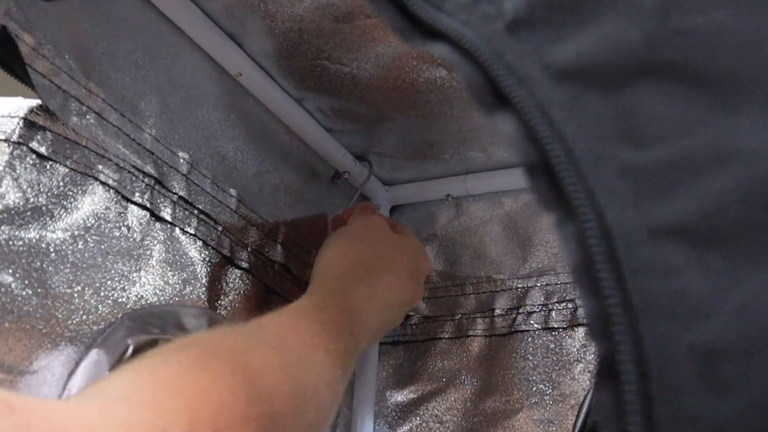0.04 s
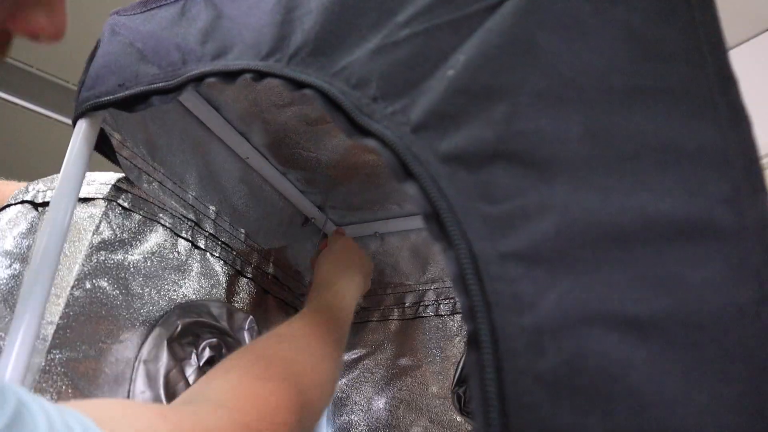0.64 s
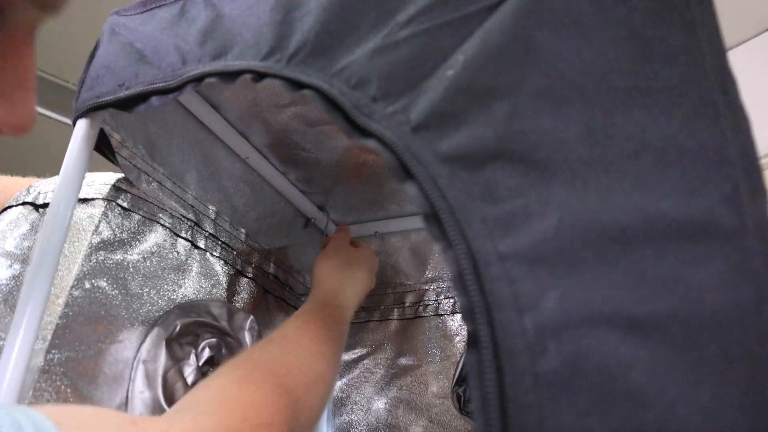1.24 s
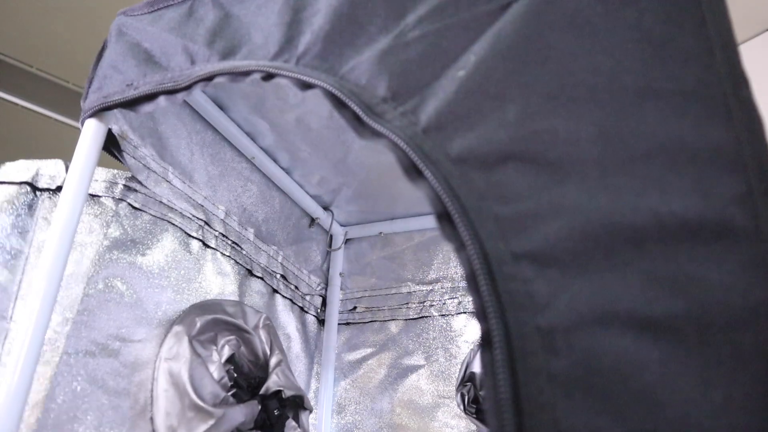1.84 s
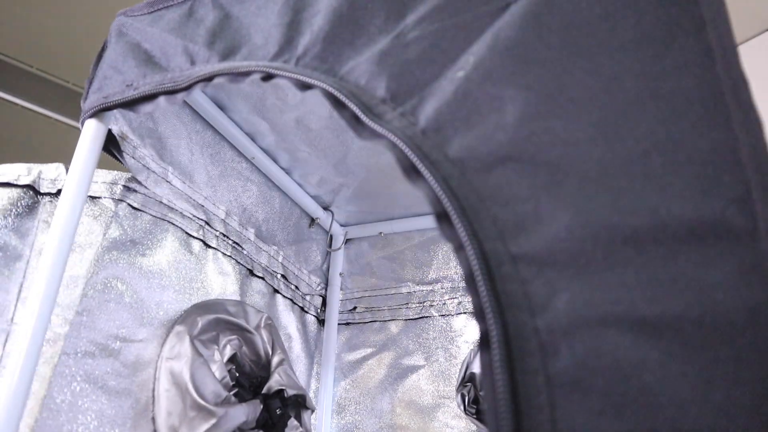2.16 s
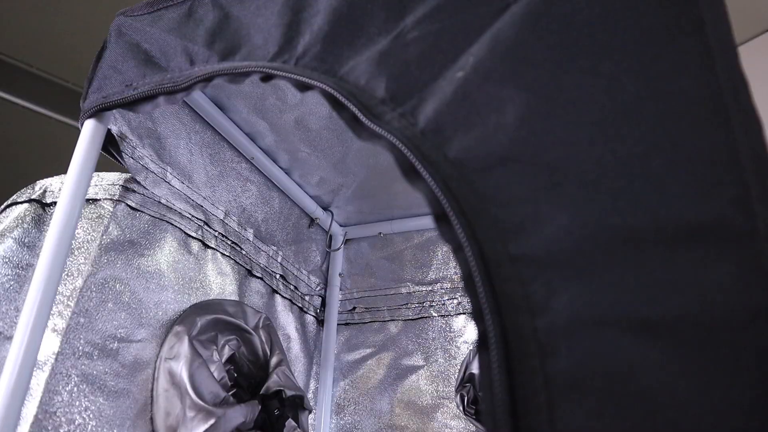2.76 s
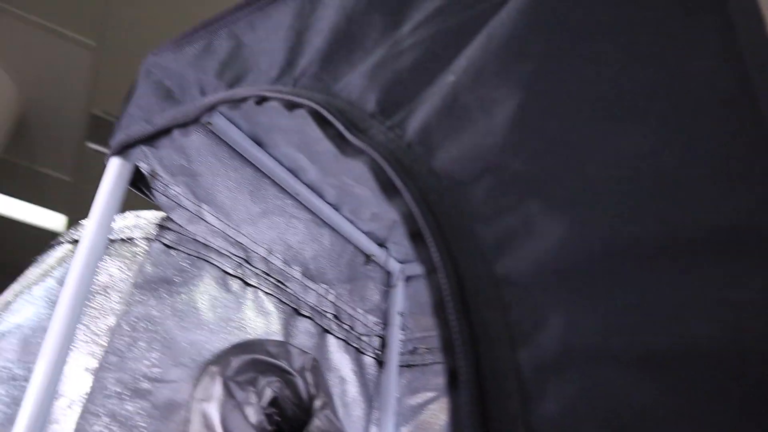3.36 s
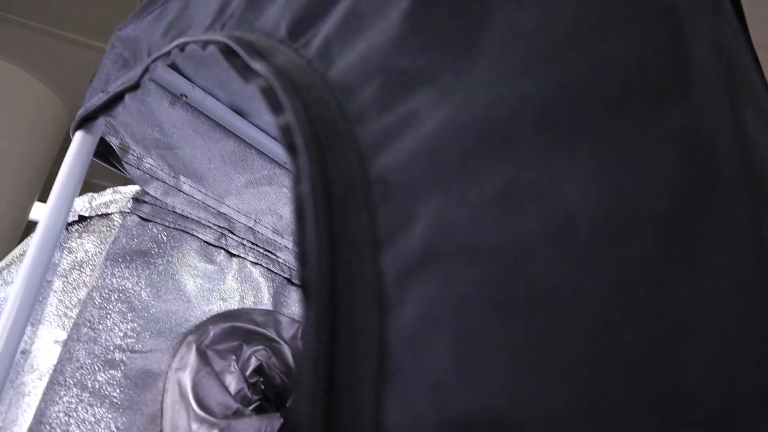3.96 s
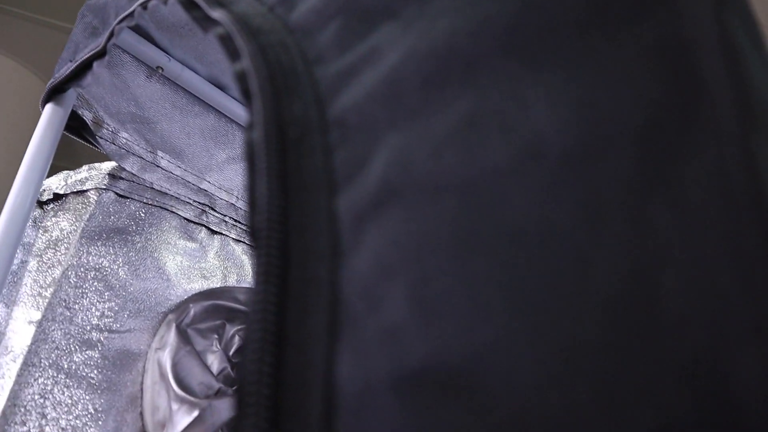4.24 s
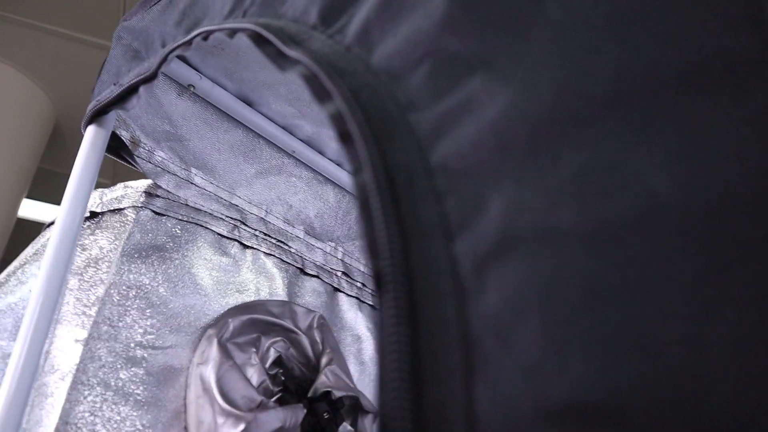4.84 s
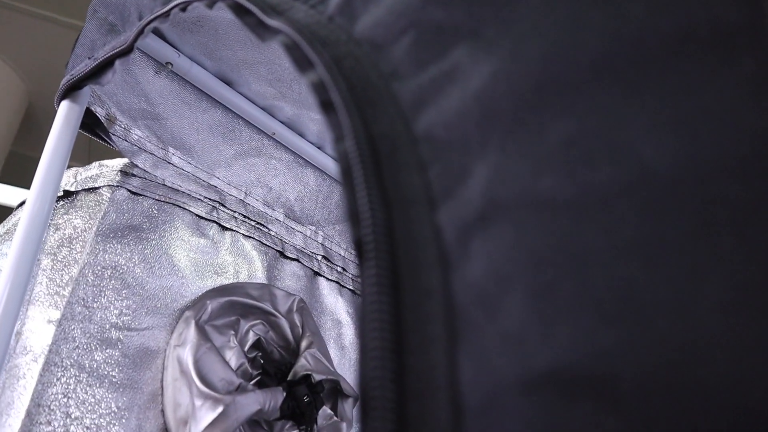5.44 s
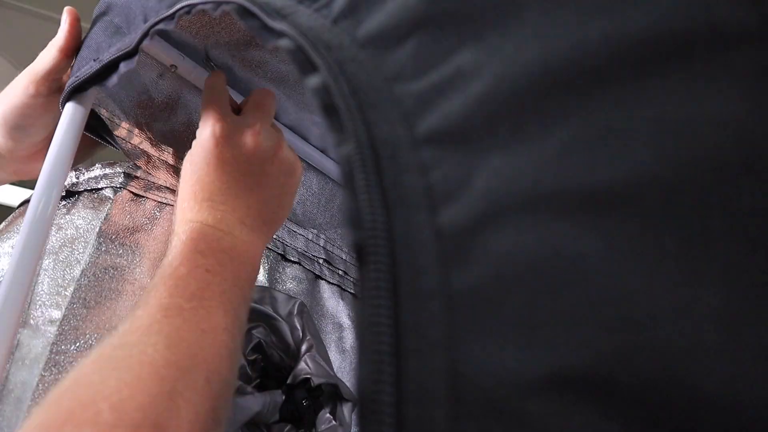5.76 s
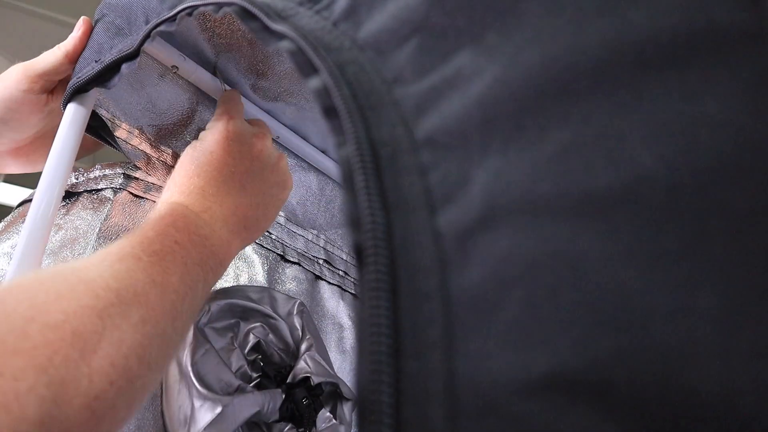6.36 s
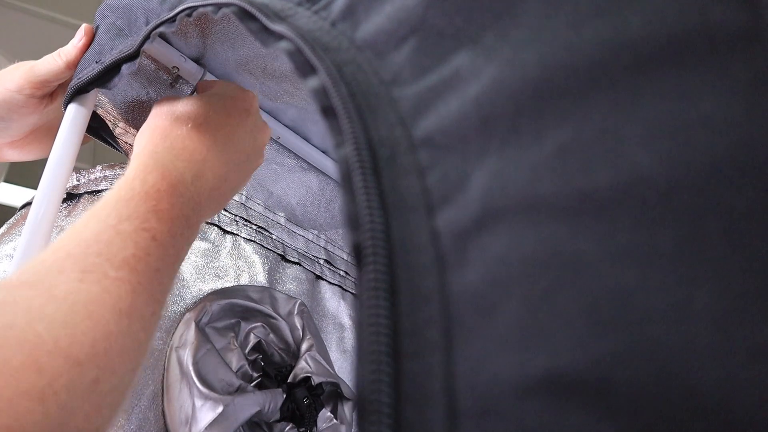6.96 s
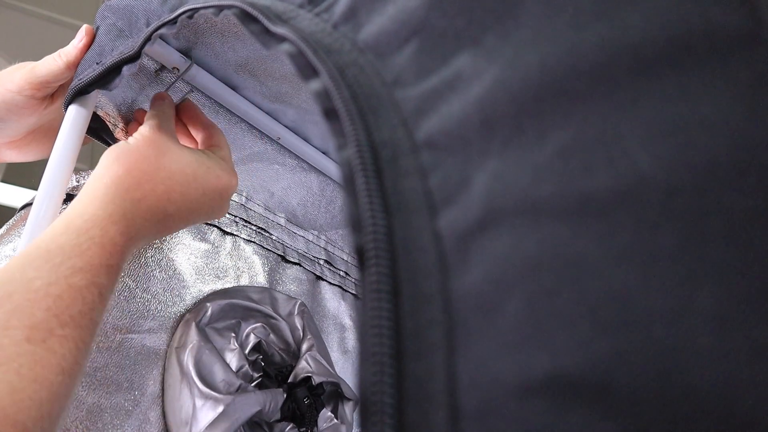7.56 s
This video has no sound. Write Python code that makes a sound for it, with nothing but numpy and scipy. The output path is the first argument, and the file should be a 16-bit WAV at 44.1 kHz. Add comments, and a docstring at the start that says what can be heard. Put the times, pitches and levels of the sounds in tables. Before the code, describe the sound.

Close to the microphone, tent cloth sways and rustles, its foil lining hissing lightly while the padded-sounding frame knocks. The fabric slaps tight, then a wire hook strikes a pole with a short ringing clatter. After a quieter stretch of scattered rubbing, more knocks come with a few sharp metallic clicks as a hook is hung. Faint ventilation rumbles through the small indoor scene.

```python
"""The fabric of a foil-lined tent billows, rubs and crinkles under an arm, close up in a quiet room.
The cloth slaps taut, the damped frame knocks, and quick strokes over the foil hiss. Wire hooks are
hung on the metal poles: each clicks, rings and sets the pole clattering. Now and then a crease in
the foil snaps over. Ventilation rushes low underneath, and both channels carry the same sound."""
import sys
import numpy as np
from scipy import signal
from scipy.io import wavfile
from scipy.ndimage import uniform_filter1d

SR = 44100
rng = np.random.default_rng(int(sys.argv[2]) if len(sys.argv) > 2 else 0)


def to_wav(s):
    """Save 16-bit WAV."""
    ch = np.atleast_2d(s).T  # columns
    pcm = np.round(np.clip(ch, -1, 1) * 32767)  # PCM
    wavfile.write(sys.argv[1], SR, pcm.astype(np.int16))


N = 339570
TIME = np.arange(N) / SR
AGE = np.arange(SR // 2) / SR  # seconds since a hit

# held fabric creeping faintly between strokes: t/s, rub level/dB
CREEP_LEVELS = [(0, -62), (1.1, -60.5), (1.6, -57.5), (2.08, -57.5), (2.5, -70.5), (4.25, -71),
                (4.55, -61.5), (5.3, -75), (5.65, -64), (6.15, -58.5), (6.7, -59), (7.03, -68.5),
                (7.2, -62), (7.7, -67)]
# arm and hands sliding over the fabric: t/s, length/s, rub level/dB, swell/dB, foil over rub/dB
ARM_STROKES = [(0, 0.35, -47.5, -3.5, -10.5), (0.381, 0.072, -47.5, 2, -11),
               (.487, 0.38, -46.5, -2.5, -7.5), (0.902, 0.14, -50.5, 5.5, -5.5),
               (1.12, 0.4, -49.5, -0.5, -9.5), (1.792, 0.12, -52.5, 14, -9), (2.155, 0.057, -50, -4, -11),
               (2.677, 1, -56, -8, 0), (3.53, 0.072, -41.5, -1, -3), (3.594, 0.08, -53.5, 5.5, -2),
               (3.682, 0.46, -56.5, -8.5, -5), (4.553, 0.13, -53.5, 3, -4.5),
               (4.689, 0.24, -49.5, -6, -0.5), (4.924, 0.11, -52.5, -1.3, .5), (5.039, 0.15, -65, 2.7, -5),
               (5.671, 0.21, -52.5, -4.5, -7), (6.282, 0.2, -53, -7, -23), (6.75, 0.1, -58, 8, -16)]
# the whole wall heaving when pushed: peak t/s, width/s, level/dB
WALL_HEAVES = [(.395, 0.061, -38.5), (0.518, .12, -38.5), (1.019, 0.064, -37), (1.87, .16, -38),
               (1.935, 0.042, -34.5), (2.08, 0.092, -43), (2.185, 0.068, -40), (4.63, 0.07, -53),
               (6.43, 0.28, -45), (6.82, 0.063, -41.5)]
# boom of swaying cloth: f/Hz, level/dB
BILLOW_EQ = [(40, -34.5), (80, 5.5), (130, 1), (200, 0.5), (350, -2), (500, -7.5), (800, -19.5),
             (1500, -44)]
# midrange rasp of the weave: f/Hz, level/dB
RUB_EQ = [(250, -26), (500, 2.5), (900, -2.5), (1500, -5), (2500, -8.5), (3500, -16.5), (5000, -30),
          (8000, -38)]
# sparkle of the foil lining: f/Hz, level/dB
FOIL_EQ = [(1800, -2.5), (3500, 4), (5000, 2), (7500, -2.5), (10000, -7), (16000, -19.5)]
# fabric going taut: t/s, level/dB, corner f/Hz, t60/s
FLAP_HITS = [(0.006, -24, 196, 0.22), (0.095, -25, 328, 0.034), (0.189, -21.5, 312, 0.064),
             (0.503, -27.5, 189, 0.15), (1.5248, -11.5, 420, 0.21), (1.564, -28, 477, 0.11),
             (1.611, -28.5, 805, 0.036), (1.791, -26.5, 700, 0.07), (2.012, -31.5, 135, 0.048),
             (3.546, -24, 350, 0.11), (4.003, -37, 180, 0.037), (5.6766, -33.5, 415, 0.11),
             (5.926, -24.5, 195, 0.06), (6.05, -27.5, 99, 0.078), (6.137, -31, 606, .05),
             (7.106, -32.5, 393, 0.099), (7.146, -27, 169, 0.16)]
# dull body of taut fabric: f/Hz, level/dB
TAUT_EQ = [(30, -21), (70, -6.5), (150, 0.5), (1000, 1), (2500, -9.5), (16000, -36)]
# blows on the frame: t/s, level/dB, resonance f/Hz, t60/s, tick level/dB
KNOCK_HITS = [(0.164, -21, 910, 0.011, -42.5), (0.2235, -30.5, 1140, 0.055, -46.5),
              (0.407, -24.5, 1330, 0.025, -57), (0.4668, -31.5, 1090, 0.011, -45),
              (1.807, -24, 490, 0.049, -48), (1.861, -19.5, 626, 0.065, -42),
              (1.9251, -15.5, 790, 0.043, -44), (2.053, -29, 640, 0.065, -49),
              (2.2089, -34, 460, 0.073, -52), (2.3077, -27, 580, 0.023, -59),
              (2.5635, -41, 800, 0.041, -68), (3.569, -25.5, 900, 0.069, -48), (3.815, -43, 900, .04, -62),
              (4.177, -42, 890, 0.011, -55.5), (4.649, -37, 700, 0.14, -66), (4.971, -28.5, 485, 0.23, -66),
              (5.9147, -28.5, 710, 0.023, -45), (6.1544, -26.5, 520, 0.062, -50),
              (6.2509, -13.5, 900, 0.025, -49), (6.3893, -32.5, 530, 0.084, -57),
              (6.431, -22.5, 720, 0.088, -41), (6.539, -19, 626, 0.032, -30),
              (6.8651, -17, 1060, 0.063, -49), (7.1366, -24.5, 776, .09, -35.5),
              (7.283, -38.5, 1180, 0.024, -43), (7.3825, -25, 1470, 0.046, -27.5)]
# body of the cloth-damped frame: f/Hz, level/dB
FRAME_EQ = [(30, -20.5), (140, -2), (400, -4), (1000, -0.5), (1600, 2), (2300, 3), (3000, 3), (3700, 2),
            (6000, -24), (16000, -35.5)]
# the arm brushing quickly past the foil: t/s, length/s, level/dB, swell/dB
SWISH_STROKES = [(.495, 0.344, -62.5, 0), (1.27, 0.22, -67, 10), (1.823, .11, -64, 3)]
# airy top of brushed foil: f/Hz, level/dB
SWISH_EQ = [(4000, -37), (9000, -3), (13000, -1), (16000, -11)]
# hooks meeting poles: t/s, click level/dB, click t60/s, hook level/dB, hook detune/Hz,
# hook ring time factor, pole level/dB
CLINK_HITS = [(1.932, -30, .05, -41, 100, .6, -44), (2.7760, -29, .05, -44, 0, .7, -14),
              (2.8025, -33, .05, -52, 0, .7, -25), (6.532, -28.5, .06, -30, 120, 1.4, -52),
              (6.8657, -13, .045, -21, 0, .85, -44), (7.380, -26, .06, -34.5, -290, 2.0, -42)]
# bright click of metal on metal: f/Hz, level/dB
CLICK_EQ = [(150, -15), (1250, 1.5), (1800, -17), (2350, -1), (2750, -6), (3250, -4.5), (4200, -14.5),
            (5100, -8), (6200, -14.5), (7300, 2), (8600, 0), (9400, -4), (11700, 1), (16000, -16)]
# ring of a wire hook: f/Hz, level/dB, t60/s
HOOK_MODES = [(1500, -8, .05), (3400, -9, .05), (5100, -11, .07), (6770, -12, .1), (7163, 0, .13),
              (7885, -2, .06), (8011, -7, .07), (8390, -1, .06), (8648, -6, .06), (11070, -7, .05),
              (11750, -7, .06)]
# ring of a pole: f/Hz, level/dB, t60/s
POLE_MODES = [(920, -13, .09), (4060, -9, .08), (4102, -34, .5), (4208, -10, .08), (4649, -7, .08),
              (4700, -31, .7), (4769, 0, .085), (6438, -10, .05), (7650, -7, .06), (13065, -12, .1),
              (14700, -12, .04)]
# a pole rattling in its socket: f/Hz, level/dB
CLATTER_EQ = [(200, -23.5), (1000, -0.5), (1800, -13), (3200, -6.5), (4500, 11), (5400, 2), (7900, 5.5),
              (10000, -9), (12300, -18.5), (14700, -3), (16000, -26.5)]
# single foil creases flipping over: t/s, level/dB
SNAP_HITS = [(4.0034, -53), (5.4915, -45.5), (5.8464, -45), (5.861, -45), (5.934, -49), (6.444, -43)]
# ventilation rumble: f/Hz, level/dB
VENT_EQ = [(20, -33), (45, -3.5), (70, 1), (100, -4), (150, -9), (300, -15), (450, -18), (1000, -28.5),
           (2500, -34.5), (15500, -35)]
# the room's decay: f/Hz, t60/s
ROOM_DECAY = [(100, 0.31), (500, 0.5), (2000, 0.3), (5000, 0.43), (8000, 0.29), (15000, 0.14)]

HIT_BUS_DB = -8.5  # trims every level in the four HITS tables
USUAL_RUB_DB, USUAL_BILLOW_DB = -49, -49.5  # an ordinary stroke
BILLOW_SLOPE = 0.53  # dB per dB of rub: the cloth's sway grows more slowly than its friction


def amp(db):
    """Decibels to gain."""
    return 10 ** (np.asarray(db) / 20)


def unit_rms(x):
    """Scales to rms 1."""
    return x / np.sqrt(np.mean(x ** 2) + 1e-20)


def unit_hit(x):
    """Scales a hit to rms 1 over its first 10 ms."""
    return x / np.sqrt(np.mean(x[:440] ** 2) + 1e-20)


def curve_at(points, hz):
    """Reads a table along a log-frequency axis."""
    f, value = np.transpose(points)
    return np.interp(np.log(hz + 1), np.log(f + 1), value)


def add(mix, t, sound):
    """Drops a sound into the mix at t seconds."""
    part = mix[max(0, round(t * SR)):][:len(sound)]
    part += sound[:len(part)]


def decay(t60):
    """An envelope that falls 60 dB in t60 seconds."""
    return np.exp(-np.log(1000) * AGE / np.maximum(t60, 1e-3))


def eq(x, spectrum, corner_hz=None, q=1.3, size=4096):
    """Minimum-phase EQ; a corner adds the resonant low-pass of a soft blow."""
    hz = abs(np.fft.fftfreq(size, 1 / SR))
    gain = amp(curve_at(spectrum, hz))
    if corner_hz:
        gain = gain / abs(1 - (hz / corner_hz) ** 2 + 1j * hz / corner_hz / q)
    log_response = np.conj(signal.hilbert(np.log(gain + 1e-7)))
    taps = np.fft.ifft(np.exp(log_response)).real
    return signal.oaconvolve(x, taps[:size // 2])[:len(x)]


def rattle(t60, impulse):
    """An impulse, then dying noise for a crowd of short-lived modes."""
    crowd = rng.standard_normal(len(AGE)) * decay(t60)
    return crowd / np.linalg.norm(crowd) + impulse * (AGE == 0)


def friction(slips_per_s, spread_db, smooth):
    """Tiny slips of uneven size over a bed of smooth noise."""
    sizes = amp(spread_db * np.minimum(rng.exponential(1, N), 4))
    slips = sizes * rng.standard_normal(N) * (rng.random(N) < slips_per_s / SR)
    return unit_rms(slips) + smooth * rng.standard_normal(N)


def stroke(start, length, swell_db, attack_s=0.017, release_s=0.035):
    """Friction bites quickly, swells or sags evenly while the arm slides, and stops."""
    age = TIME - start
    attack = np.clip(age / attack_s + .5, 0, 1)
    release = np.clip((length - age) / release_s + .5, 0, 1)
    return attack * release * amp(swell_db * np.clip(age / length, 0, 1))


def handling():
    """Envelopes of billow, rub and crinkle: creep, strokes and heaves add in power."""
    creep = amp(np.interp(TIME, *np.transpose(CREEP_LEVELS)))
    billow, rub, crinkle = (creep * amp(6.5)) ** 2, creep ** 2, (creep * amp(-6)) ** 2
    for start, length, rub_db, swell_db, foil_db in ARM_STROKES:
        slide = stroke(start, length, swell_db)
        billow_db = USUAL_BILLOW_DB + BILLOW_SLOPE * (rub_db - USUAL_RUB_DB)
        billow += (slide * amp(billow_db)) ** 2
        rub += (slide * amp(rub_db)) ** 2
        crinkle += (slide * amp(rub_db + foil_db)) ** 2
    for t, width, db in WALL_HEAVES:
        billow += (amp(db) * np.exp(-(2 * (TIME - t) / width) ** 2)) ** 2
    return np.sqrt([billow, rub, crinkle])


def folds(x, depth_db):
    """Shifting folds brighten and dim patches of the spectrum."""
    spectra = signal.stft(x, nperseg=512, noverlap=384)[2]
    patches = uniform_filter1d(rng.standard_normal(spectra.shape), 9, axis=0)
    patches = unit_rms(uniform_filter1d(patches, 9, axis=1))
    return signal.istft(spectra * amp(depth_db * patches), nperseg=512, noverlap=384)[1][:N]


def fabric():
    """The cloth billows, its weave rubs and its foil lining crinkles, all under one uneven grip."""
    billow_env, rub_env, crinkle_env = handling()
    grip_db = 1.4 * unit_rms(uniform_filter1d(uniform_filter1d(rng.standard_normal(N), 500), 300))
    billow = unit_rms(eq(friction(slips_per_s=400, spread_db=2, smooth=0.97), BILLOW_EQ))
    rub = unit_rms(eq(friction(slips_per_s=1500, spread_db=2, smooth=1), RUB_EQ))
    crinkle = unit_rms(eq(friction(slips_per_s=2700, spread_db=1, smooth=1.6), FOIL_EQ))
    cloth = billow_env * billow + rub_env * rub + crinkle_env * crinkle
    return folds(cloth * amp(grip_db), depth_db=1)


def ventilation():
    """Moving air lays a steady low rush under everything."""
    return amp(-56.5) * unit_rms(eq(rng.standard_normal(N), VENT_EQ))


def fabric_flaps():
    """Fabric pulling taut gives a soft, dull slap with no ring."""
    out = np.zeros(N)
    for t, db, corner_hz, t60 in FLAP_HITS:
        slap = unit_hit(eq(rattle(t60, impulse=0.37), TAUT_EQ, corner_hz, q=1.02))
        add(out, t, amp(db) * slap)
    return out


def frame_knocks():
    """Hollow blows on the cloth-damped frame, each topped with a tick from the foil."""
    out = np.zeros(N)
    for t, db, hz, t60, tick_db in KNOCK_HITS:
        body = unit_hit(eq(rattle(t60, impulse=0.27), FRAME_EQ, hz, q=2.25))
        tick = unit_hit(eq(rattle(t60 * 1.26, impulse=0.57), FOIL_EQ))
        add(out, t, amp(db) * body + amp(tick_db) * tick)
    return out


def foil_swishes():
    """Fast strokes over the foil raise an airy hiss."""
    hiss = unit_rms(eq(friction(slips_per_s=4200, spread_db=6, smooth=1.4), SWISH_EQ))
    return hiss * sum(amp(db) * stroke(t, length, swell) for t, length, db, swell in SWISH_STROKES)


def ring(modes, detune_hz=0, stretch=1):
    """Struck metal rings in decaying modes, their phases random as the point of contact varies."""
    return sum(amp(db) * decay(t60 * stretch)
               * np.sin(2 * np.pi * ((hz + detune_hz) * AGE + rng.random())) for hz, db, t60 in modes)


def hook_clinks():
    """Metal chatters on metal: the wire rings, longer if left free, and the pole clatters."""
    out = np.zeros(N)
    for t, click_db, t60, hook_db, detune_hz, stretch, pole_db in CLINK_HITS:
        click = unit_hit(eq(rattle(t60, impulse=0.12), CLICK_EQ))
        hook = ring(HOOK_MODES, detune_hz, stretch)
        pole = amp(-2) * ring(POLE_MODES)
        clatter = unit_hit(eq(rattle(t60=0.05, impulse=0.3), CLATTER_EQ))
        add(out, t, amp(click_db) * click + amp(hook_db) * hook + amp(pole_db) * (pole + clatter))
    return out


def foil_snaps():
    """A crease in the foil flips over with one dry tick."""
    out = np.zeros(N)
    for t, db in SNAP_HITS:
        tick = unit_hit(eq(rattle(t60=0.012, impulse=0.59), FOIL_EQ))
        add(out, t, amp(db) * tick)
    return out


def room_reverb(x, predelay_s=0.006):
    """A short, diffuse tail whose top end dies first."""
    noise = rng.standard_normal(len(AGE)) * (AGE > predelay_s)
    hz, t, spectra = signal.stft(noise, SR, nperseg=256)
    t60 = curve_at(ROOM_DECAY, hz)[:, None]
    tail = signal.istft(spectra * np.exp(-np.log(1000) * t / t60), SR, nperseg=256)[1]
    return signal.oaconvolve(x, tail / np.linalg.norm(tail))[:N]


def scene():
    """The tent up close and dead centre, with a touch of room, over the ventilation bed."""
    tent = fabric() + foil_swishes()
    tent += amp(HIT_BUS_DB) * (fabric_flaps() + frame_knocks() + foil_snaps() + hook_clinks())
    mono = tent + amp(-18.5) * room_reverb(tent) + ventilation()
    return np.array([mono, mono])


def record(dry):
    """A steep high cut at 15.9 kHz limits the band."""
    high_cut = signal.firwin(401, 15900, window=("kaiser", 9), fs=SR)
    return signal.oaconvolve(dry, high_cut[None], "same")


dry = scene()
out = record(dry)
to_wav(out)
```